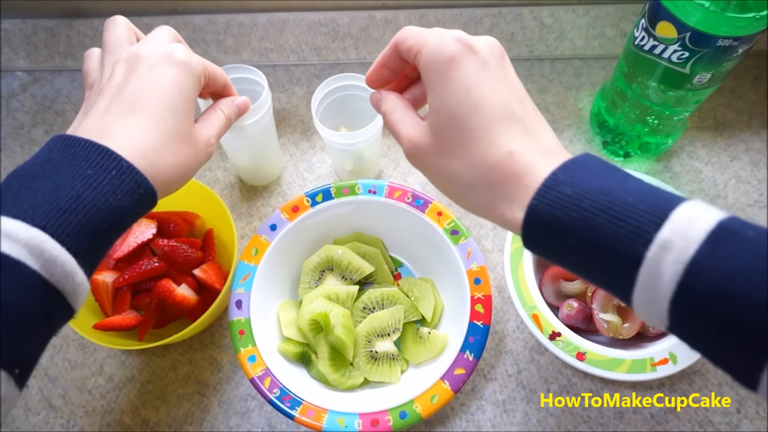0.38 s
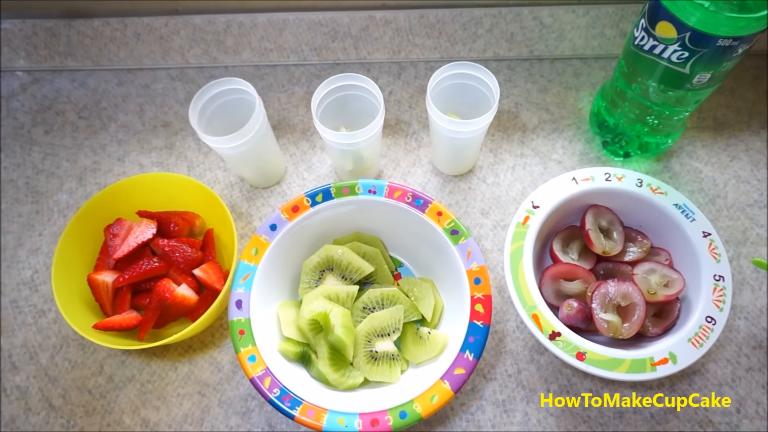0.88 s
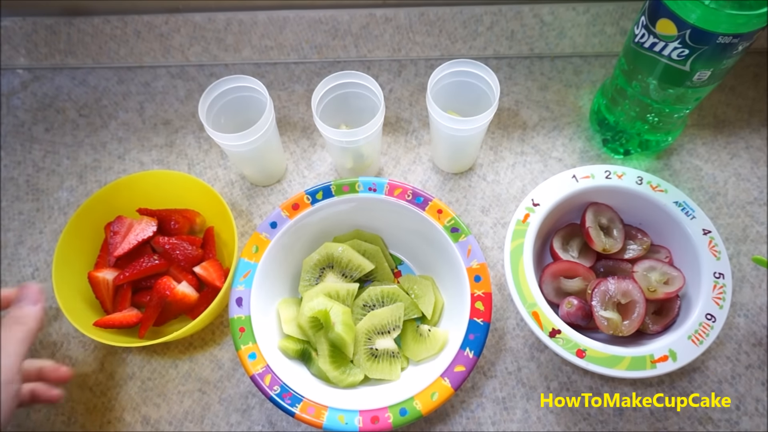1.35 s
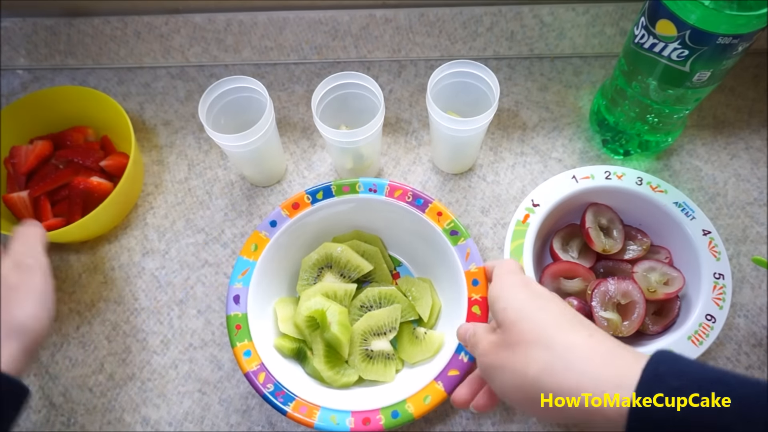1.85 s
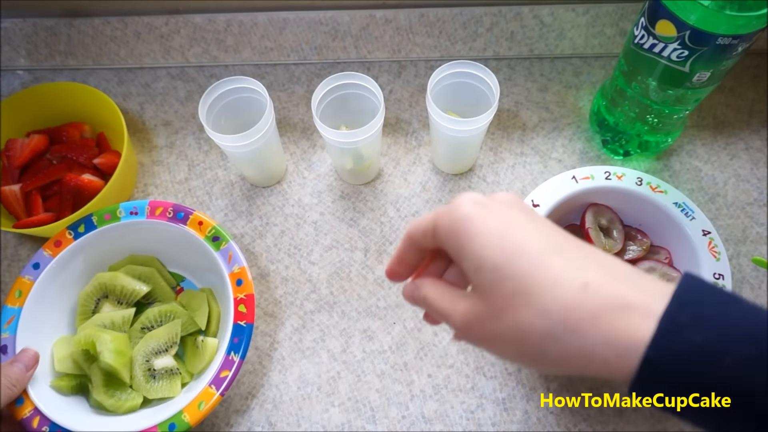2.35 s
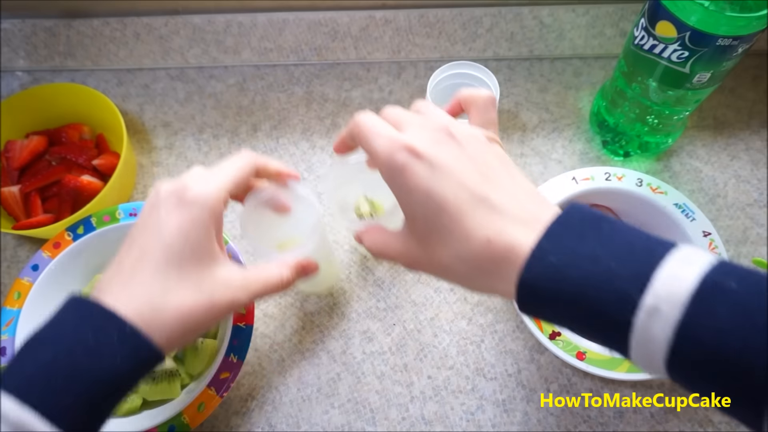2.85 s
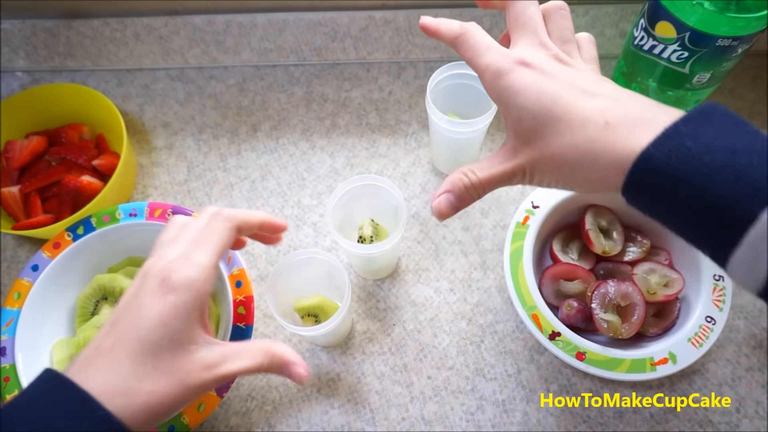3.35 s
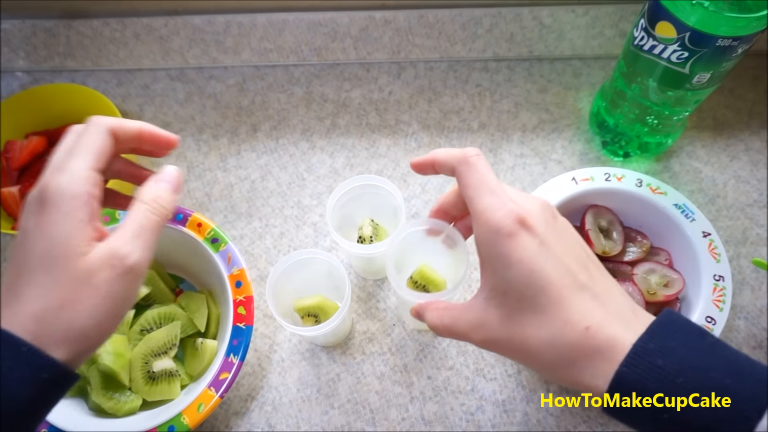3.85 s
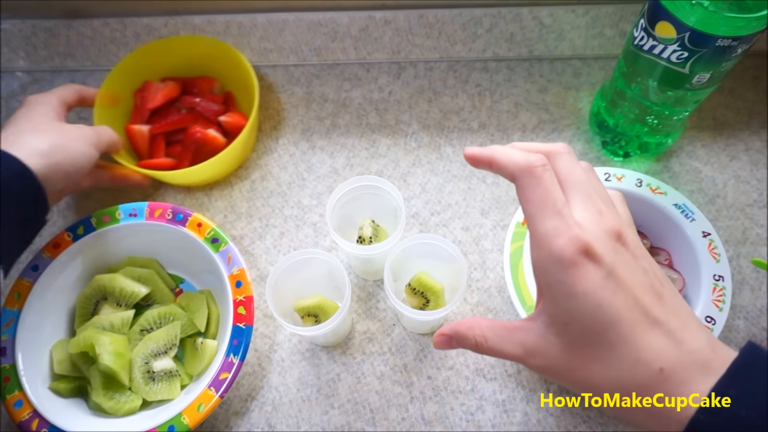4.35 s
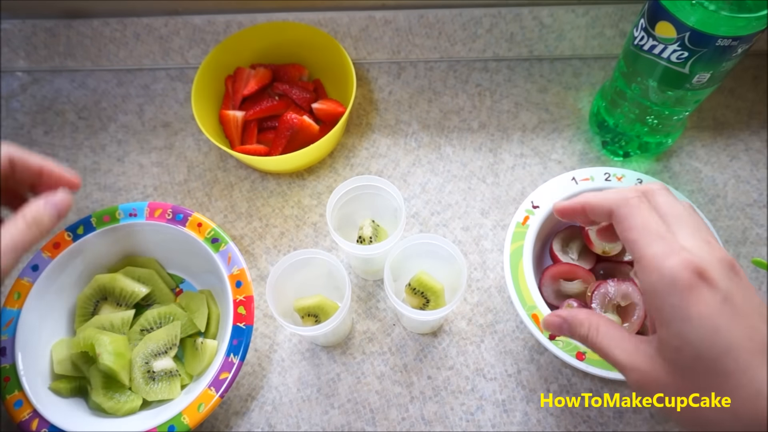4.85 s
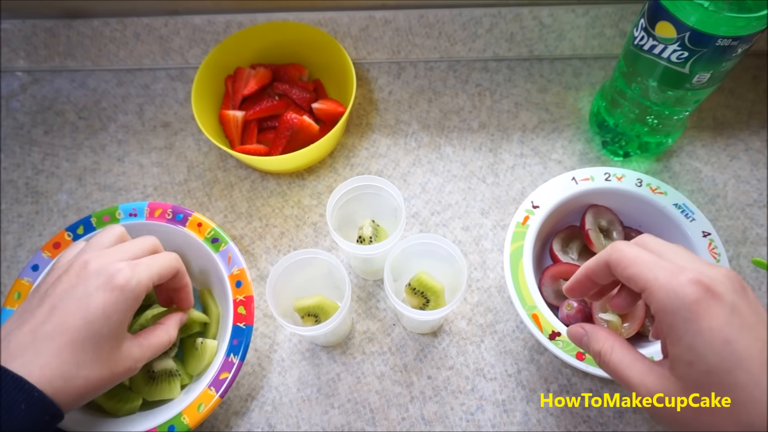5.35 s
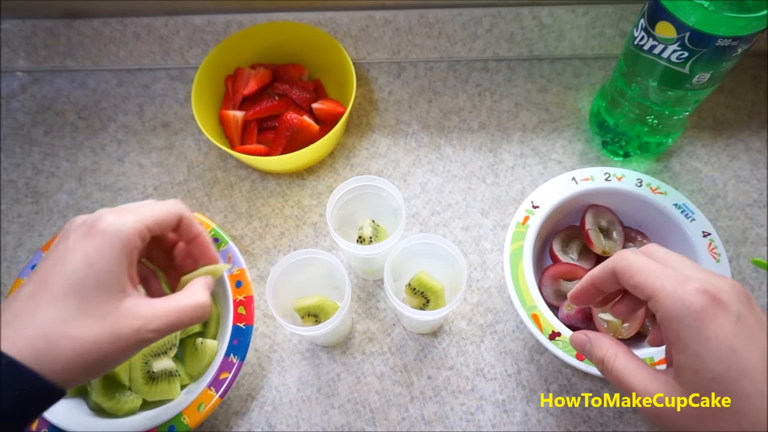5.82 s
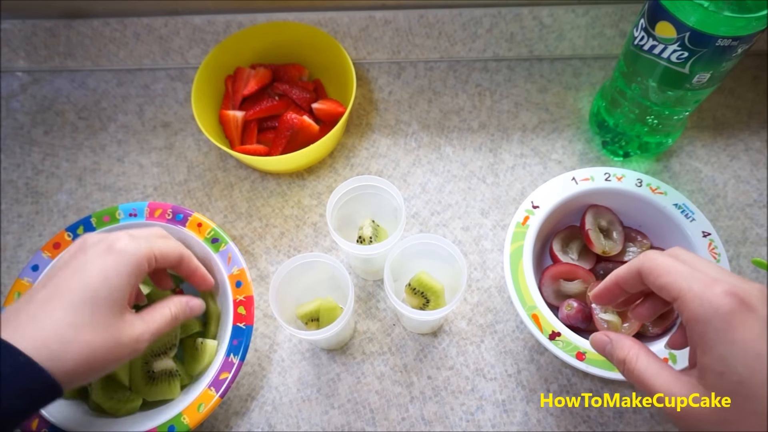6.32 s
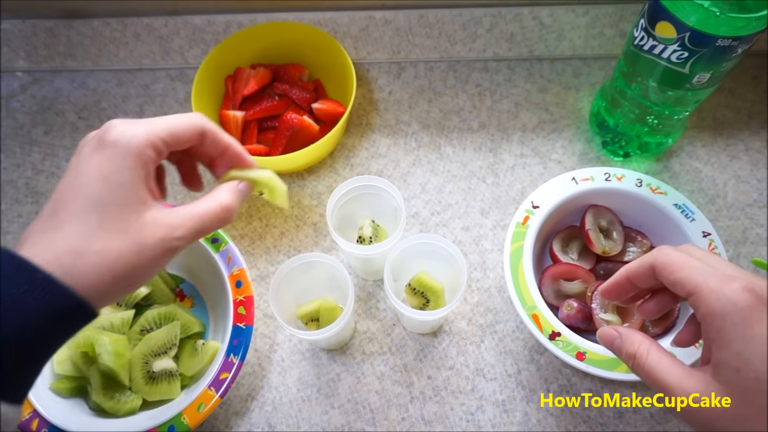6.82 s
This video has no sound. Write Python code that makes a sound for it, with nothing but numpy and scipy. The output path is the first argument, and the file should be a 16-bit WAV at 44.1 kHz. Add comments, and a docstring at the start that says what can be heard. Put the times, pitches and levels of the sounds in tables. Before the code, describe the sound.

Quiet kitchen counter handling: small wet clicks, a crunchy bump, bowls dragged with scraping, hollow plastic cup taps, and a faint ticking clock.

```python
"""A soft hiss comes first, then a small wet click, light taps on plastic cups and a clock ticking about twice a second.
On a kitchen counter, hands bump the edge, drop sliced fruit into small cups, set them down and drag two plastic bowls.
Blows ring a few fading tones under a bright crack; sliding is rough friction noise shaking resonances.
Small clicks are short filtered noise bursts, the bump a quick run of cracks, and the hard kitchen answers with an echo."""
import sys
import numpy as np
from scipy import signal
from scipy.fft import rfft, irfft, next_fast_len
from scipy.io import wavfile
from scipy.ndimage import uniform_filter1d, map_coordinates

SR = 44100
rng = np.random.default_rng(int(sys.argv[2]) if len(sys.argv) > 2 else 0)


def gain_from_db(level_db):
    """Convert decibel levels to linear amplitude factors (20 dB per decade)."""
    decades = np.asarray(level_db, float) / 20
    return 10 ** decades


def store_wav(level_fs):
    """Save 16-bit WAV to argv[1]."""
    pcm = np.round(np.clip(np.atleast_2d(level_fs), -1, 1) * 32767)
    wavfile.write(sys.argv[1], SR, pcm.T.astype(np.int16))


N = 317520  # samples, 7.2 s

# In all tables, t60 is the time in which a sound falls by 60 dB, and pan is left over right.
# taps on the cups, and soft swells echoing two of them: t/s, level/dB, rim tick/dB, brightness/(dB per octave)
CUP_TAPS = [(0.436, -48, 0, 4), (0.54, -38.5, -17, 8), (0.618, -44, -23, -12), (0.703, -50.5, -14, 0.1),
            (0.772, -42.5, -14, -15), (2.9755, -26, -36, -4), (2.998, -18.5, -19, 3.5),
            (3.039, -33, -38, 4), (3.0895, -26, -40, 0.1), (3.121, -44.5, -40, 5), (3.341, -47, -21, -19),
            (3.914, -45, 10, 3), (3.938, -39, 0, 6), (3.9475, -23, -24, -6), (3.978, -35, -33, 6),
            (4.03, -41, -35, 0.1), (4.075, -45.5, -35, 2), (6.18, -46, -3, 12), (6.972, -30, 7, 8),
            (6.984, -37.5, 0, 5), (7.0175, -31, -18, -2), (7.103, -26, 2.5, -4), (7.121, -29, -15, 10.5),
            (7.17, -31.5, -6, 7)]
# ringing tones of a cup: f/Hz, level/dB, t60/s
CUP_TONES = [(817, -14, 0.031), (1070, -20, 0.051), (1380, -5.5, 0.031), (1648, -6.5, 0.047),
             (1905, -2.5, 0.052), (1980, -6, 0.026), (2096, 10, 0.043), (2196, 7, 0.052), (2324, -5, 0.071),
             (2950, -4, 0.022), (4360, -38, 0.012), (5000, -26, 0.037), (5330, -29, 0.032),
             (8140, -23, 0.018)]
# resonances of a cup's sliding foot: f/Hz, width/Hz, level/dB
CUP_FOOT = [(820, 210, -10), (975, 78, -2.5), (1660, 690, -7)]
# cups sliding on their feet: start t/s, rise/s, fall/s, top level/dB
CUP_SLIDES = [(.7, 0.11, 0.75, -64), (1.0, 0.13, 0.66, -62.5), (3.33, 0.026, 1, -66),
              (6.92, 0.032, 0.46, -58.5), (7.07, 0.036, .15, -68)]
# knocks of the wide bowl's rim and foot: t/s, level/dB, sharp edge/dB, brightness/(dB per octave), pan/dB
BOWL_KNOCKS = [(1.788, -25.5, -17, -4, 7.5), (1.868, -24, -23, 8, 12), (1.8795, -15, -30.5, 3, 10),
               (2.0225, -16.5, -45, -0.5, 0), (2.057, -17, -10, -8, -3), (2.097, -20.5, -25, 4, 0),
               (2.16, -31, -16, -10, 0), (2.1845, -19.5, -36, -3.5, 4), (2.232, -25, -32, -7, 2.0),
               (2.245, -25.5, -30, -7.5, 4), (2.285, -15.5, -39, -2, -1), (2.291, -12, -36, -1.5, 6),
               (2.3035, -9.5, -22, 12, 12.5), (2.319, -15.5, -29, 10.5, 9), (2.34, -22, -15, -4.5, 8),
               (2.369, -16, -36, -4, 4.5)]
# ringing tones of the wide bowl: f/Hz, level/dB, t60/s
WIDE_BOWL_TONES = [(510, -24, 0.046), (740, 0, 0.017), (938, -5.5, 0.026), (1093, -14.5, 0.048),
                   (1440, 1, 0.015), (1637, -3, 0.025), (2110, -3, 0.014), (2430, 12.5, 0.0071),
                   (3076, -3.5, 0.036), (3760, 11, 0.0056), (4320, 14.5, 0.0067), (4500, 6, 0.0062),
                   (5160, -7, 0.0075), (6000, -32, 0.012)]
# the wide bowl is pushed in jerks: start t/s, rise/s, fall/s, top level/dB
WIDE_PUSHES = [(1.783, 0.0071, .3, -51), (1.8, .09, .28, -48), (1.9, .15, .38, -42), (2.14, .06, .15, -52),
               (2.14, .17, .36, -39)]
# the small bowl dragged twice, then nudged briefly: t/s, foot rumble level/dB, scrape level/dB
SMALL_DRAGS = [
    [(1.58, -85, -63.5), (1.63, -64, -49.5), (1.69, -57, -48.5), (1.78, -62.5, -49.5), (1.88, -51, -54.5),
     (1.92, -76, -70)],
    [(4.17, -87, -71), (4.25, -63.5, -52.5), (4.31, -51.5, -47), (4.375, -40, -43.5), (4.44, -44.5, -40.5),
     (4.49, -44.5, -36.5), (4.672, -72, -67), (4.714, -72, -53), (4.85, -77, -87)],
]
# resonances of the small bowl's foot: f/Hz, width/Hz, level/dB
SMALL_FOOT = [(520, 63, -2), (765, 44, 2), (928, 33, 1.5), (1104, 123, 0), (1420, 1440, -9)]
# resonances of the small bowl's wall: f/Hz, width/Hz, level/dB
SMALL_WALL = [(2060, 1300, -13.5), (2760, 460, 9), (3200, 320, 7.5), (4440, 1230, 2.5)]
# resonances of the small bowl's sliding hiss: f/Hz, width/Hz, level/dB
SMALL_HISS = [(6820, 1400, 0), (8630, 870, -1), (10600, 2600, -6), (13900, 3200, -9.5)]
# a fingernail touching a bowl's rim: t/s, level/dB, sharp edge/dB, brightness/(dB per octave), pan/dB
NAIL_TAPS = [(5.2213, -27.5, -6, 1.5, 4), (5.668, -43.5, -33, -13, 6.5), (6.3919, -42, -15, 0.1, 2.5),
             (6.4056, -38, -4, -6, 8), (6.4292, -29.5, -8, -3.5, 9)]
# ringing tones of that rim: f/Hz, level/dB, t60/s
RIM_TONES = [(3990, 0, 0.057), (4500, 0, 0.032), (6230, -6, 0.045), (8300, -3.5, 0.069), (9760, -20, 0.017)]
# short noisy clicks (wet fruit, crackle after the bump, bright edges of cup taps):
# t/s, level/dB, centre f/Hz, pan/dB
SMALL_CLICKS = [(0.317, -43, 2600, -6), (1.04, -43, 6000, 11), (1.049, -34, 5410, 13),
                (1.053, -34, 7100, 22), (1.068, -35, 4500, 12), (1.079, -33, 8300, 24.5),
                (1.114, -38.5, 6000, 17), (1.29, -38.5, 3710, 5), (2.691, -39, 4500, 11),
                (2.727, -25, 6000, 4), (2.998, -33, 6000, 5), (3.556, -39.5, 7930, 0.5),
                (4.29, -42, 3120, -1), (4.427, -20.5, 7000, 12.5), (4.481, -24, 2950, -7),
                (4.689, -44, 6580, 0), (4.711, -37, 4500, 0), (5.465, -46, 2630, 5), (5.99, -42, 2550, 2),
                (6.972, -25.5, 9200, 4), (6.743, -39.5, 7390, -2), (6.759, -40, 8430, 0.5)]
# cracks as a hand thumps the counter's edge: t/s, crackle level/dB, weight over crackle/dB
BUMP_CRACKS = [(.986, -38, -3), (0.99, -34.5, -3), (0.996, -26.5, -6.5), (1.002, -30.5, -8),
               (1.008, -27.5, -14), (1.012, -34, -8), (1.021, -48, -3)]
# resonances of the bump's weight: f/Hz, width/Hz, level/dB
BUMP_BODY = [(195, 320, 2), (394, 330, 5), (930, 360, 6), (1670, 1050, -2.5)]
# resonances of the bump's crackle: f/Hz, width/Hz, level/dB
BUMP_CRACKLE = [(2840, 590, -2), (4800, 880, -2.5), (5860, 500, 1.5), (8500, 3700, -9.5)]
# ringing tones of the clock: f/Hz, level/dB, t60/s
CLOCK_TONES = [(1620, -15, 0.046), (1702, 12, 0.077), (2460, -8, 0.082)]
# kitchen echo: f/Hz, t60/s, left-right likeness (0 to 1), level/dB
KITCHEN_ECHO = [(300, 0.17, 0.88, -7), (1000, 0.33, 0.35, -2), (2520, 0.24, 0.043, -3.5),
                (6000, 0.41, 0.052, -6.5), (14000, 0.28, .05, -1.5)]
# colour of the hiss: f/Hz, level/dB
HISS_COLOUR = [(15, -56), (25, -23.5), (256, -20), (301, -13.5), (489, -13.5), (531, -10.5), (911, -3),
               (1290, -3.5), (1440, -2), (1560, -3), (2160, -1.5), (3920, -2), (13600, -12), (16000, -13.5)]
# how alike the hiss is on both sides: f/Hz, left-right likeness (-1 to 1)
HISS_ALIKE = [(60, 0.26), (180, 0.38), (550, -0.087), (1650, -0.61), (4970, -0.28), (15000, -0.013)]


def cups():
    """Thin cups are tapped by fruit, set down, rocked and nudged; each contact leaves a dying chatter."""
    # a cup rocks on its foot, ever faster and softer
    first_s, gap_s, shrink = 0.8465, 0.0625, 0.915  # each swing lasts shrink times the one before
    first_db, loss_db, tick_db, bright_db = -39, 1.2, -13.5, -4  # loss per swing, brightness per octave
    rocks = []
    for k in range(12):
        start_s = first_s + gap_s * (1 - shrink ** k) / (1 - shrink)
        rocks.append((start_s, first_db - loss_db * k, tick_db, bright_db))
    contacts = CUP_TAPS + rocks
    panned_contacts = [(*row, 3.5) for row in contacts]
    taps = struck(panned_contacts, CUP_TONES, edge_hz=4700, edge_q=6, edge_s=0.03, edge_db=17)
    chatter = gain_from_db(-30) * dying([row[:2] for row in contacts], t60=0.41)
    bodies = [broadened(CUP_TONES, 1800, 2500, 7.9), CUP_FOOT]
    slides = dragged([chatter, strokes(CUP_SLIDES)], bodies, pan_db=10.5, spike_db=3.0, lump_db=3.0)
    return taps + slides


def bowls():
    """The wide bowl knocks and scrapes, the small one hisses as it slides, and nails tick on a rim."""
    knocks = struck(BOWL_KNOCKS, WIDE_BOWL_TONES, edge_hz=5900, edge_q=0.3, edge_s=0.034, edge_db=9.5)
    nails = struck(NAIL_TAPS, RIM_TONES, edge_hz=10500, edge_q=1.0, edge_s=0.017, edge_db=16.5)
    push = strokes(WIDE_PUSHES)
    wide_foot = broadened(WIDE_BOWL_TONES, 0, 2200, 6.9)
    wide_scrape = broadened(WIDE_BOWL_TONES, 3000, 9000, 3.6)
    wide = dragged([push, gain_from_db(1) * push], [wide_foot, wide_scrape], pan_db=4.0, spike_db=15.0, lump_db=1.5)
    foot, scrape = gains(SMALL_DRAGS)
    small_levels = [foot, scrape, gain_from_db(-2) * scrape]
    small_bodies = [SMALL_FOOT, SMALL_WALL, SMALL_HISS]
    small = dragged(small_levels, small_bodies, pan_db=9.0, spike_db=5.0, lump_db=2.1)
    return knocks + nails + wide + small


def small_clicks():
    """Wet fruit, crackle and the bright edges of taps are noise bursts, each around its own centre frequency."""
    t60 = 0.0075  # seconds
    out, t = np.zeros((2, N + SR)), np.arange(SR // 10) / SR
    for s, db, centre_hz, pan_db in SMALL_CLICKS:
        common, left, right = rng.standard_normal((3, len(t)))
        puff = (common + 0.78 * np.array([left, right])) * gain_from_db(-60 * t / t60)
        click = signal.lfilter(*signal.iirpeak(centre_hz, 1.3, fs=SR), puff)
        click = click / np.abs(click.mean(0)).max()
        out[:, round(s * SR):][:, :len(t)] += gain_from_db(db) * panned(pan_db) * click
    return out[:, :N]


def bump():
    """A hand thumps and crumples against the counter's edge: a short dense crunch with some weight below."""
    t60 = 0.022  # seconds
    weight = dying([(s, db + more_db) for s, db, more_db in BUMP_CRACKS], t60)
    crackle = dying([row[:2] for row in BUMP_CRACKS], t60)
    return dragged([weight, crackle], [BUMP_BODY, BUMP_CRACKLE], pan_db=11.5, spike_db=7.5, lump_db=0.35)


def clock():
    """Tick and tock, half a second apart, are blows on a few tones; every other one is softer."""
    beats = [(0.465 + 0.4995 * k, -52 - 7.4 * (k % 2 == 0), -30, 0, 0) for k in range(14)]
    return struck(beats, CLOCK_TONES, edge_hz=2600, edge_q=0.8, edge_s=0.01, edge_db=21)


def kitchen(x):
    """Echo dies at its own speed at each pitch; a fresh random echo pattern is drawn every 0.2 s."""
    out, step = np.zeros((2, N + 2 * SR)), SR // 5
    for start in range(0, N, step):
        hz, t, (a, b) = signal.stft(rng.standard_normal((2, SR * 2 // 3)), SR, nperseg=256)
        t60, alike, level_db = (along([(row[0], row[k]) for row in KITCHEN_ECHO], hz)[:, None]
                                for k in (1, 2, 3))
        share = np.clip(alike, 0, 1)  # long waves reach both microphones alike
        pair = np.array([a, share * a + np.sqrt(1 - share ** 2) * b])
        # divide so that a longer echo does not carry more energy
        fade = gain_from_db(level_db - 60 * t / t60) / np.sqrt(t60 * SR / np.log(1e6))
        tail = signal.istft(pair * fade, SR, nperseg=256)[1]
        wet = signal.fftconvolve(x[None, start:start + step], tail, axes=1)
        out[:, start + 60:][:, :wet.shape[1]] += wet  # 60 samples of delay
    return out[:, :N]


def hiss():
    """Microphone and room noise is coloured random noise, alike on both sides only in part."""
    def turn(hz):
        # angle that shares the noise between middle and sides
        return np.arccos(np.clip(along(HISS_ALIKE, hz), -1, 1)) / 2

    def colour(hz):
        return gain_from_db(along(HISS_COLOUR, hz)) * [np.cos(turn(hz)), np.sin(turn(hz))]

    mid, side = filtered(rng.standard_normal((2, N)), colour)
    level = gain_from_db(-62.5 + 0.14 * wobble(1.87))  # drifts very slightly
    return level * np.array([mid + side, mid - side]) / np.std(mid)


def struck(events, modes, edge_hz, edge_q, edge_s, edge_db):
    """Each blow rings the tones at new strengths under a short crack; each has its own given brightness."""
    pitch_scatter = 0.007  # of a tone's frequency, blow to blow
    contact_hz, contact_db, contact_t60 = 1700, -5, 0.0061  # dull click of first contact, t60 in s
    out, t = np.zeros((2, N + SR)), np.arange(SR // 5) / SR
    hz, level_db, t60 = np.transpose(modes)[:, :, None]
    # neighbours start against each other, so close pairs swell and beat
    opposed = np.pi * np.arange(len(modes))[:, None]
    edge, dull = signal.iirpeak(edge_hz, edge_q, fs=SR), signal.iirpeak(contact_hz, 0.8, fs=SR)
    for s, db, sharp_db, bright_db, pan_db in events:
        chance = rng.standard_normal((3, len(modes), 1))
        strength_db = level_db + bright_db * np.log2(hz / 2000) + 3 * chance[0]
        phase = 2 * np.pi * hz * (1 + pitch_scatter * chance[1]) * t + opposed + 0.5 * chance[2]
        ring = np.sum(gain_from_db(strength_db - 60 * t / t60) * np.sin(phase), axis=0)
        ring = ring * (1 - np.exp(-t / 0.00018)) / np.abs(ring).max()  # soften the very start
        noise = rng.standard_normal((2, len(t)))
        crack = signal.lfilter(*edge, signal.lfilter(*edge, noise)) * gain_from_db(-60 * t / edge_s)
        contact = unit(signal.lfilter(*dull, rng.standard_normal(len(t))))
        contact = contact * gain_from_db(contact_db - 60 * t / contact_t60)
        blow = ring + contact + gain_from_db(sharp_db + edge_db) * crack
        blow = blow / max(1, np.abs(blow).max())
        out[:, round(s * SR):][:, :len(t)] += gain_from_db(db) * panned(pan_db) * blow
    # such small bodies cannot radiate deep sound
    return signal.sosfilt(signal.butter(3, 560, "high", fs=SR, output="sos"), out[:, :N])


def dragged(levels, bodies, pan_db, spike_db, lump_db):
    """One friction force shakes several sets of resonances, each set with its own gain."""
    force, out = grit(spike_db, lump_db), 0
    for gain, body in zip(levels, bodies):
        rings = 0
        for k, peak in enumerate(body):
            # the contact point moves, so each resonance comes and goes
            wander = gain_from_db(2.2 * wobble(18))
            rings = rings + (-1) ** k * wander * filtered(force, resonances([peak]))
        out = out + gain * unit(rings)
    return panned(pan_db) * out


def grit(spike_db, lump_db):
    """Friction force: dense grains of uneven size, catching in lumps."""
    grains = rng.standard_normal(N) * gain_from_db(np.clip(spike_db * rng.standard_normal(N), -20, 12))
    return grains * gain_from_db(np.clip(lump_db, 0, 3) * (wobble(35) + wobble(110)))


def strokes(rows):
    """Gain of movements that swell to a top level and fade."""
    depth_db = 44  # a stroke starts and ends this far under its top
    spans = []
    for s, rise, fall, db in rows:
        spans.append([(s, db - depth_db), (s + rise, db), (s + rise + fall, db - depth_db)])
    return gains(spans)[0]


def dying(rows, t60):
    """Gain that jumps up at each (t/s, level/dB) and dies away."""
    t = np.arange(N) / SR
    return sum((t > s) * gain_from_db(db - 60 * np.abs(t - s) / t60) for s, db in rows)


def gains(spans):
    """One smoothed gain per sample for each level column, practically silent outside the spans."""
    t = np.arange(N) / SR
    total = 0
    for rows in spans:
        s, *columns = np.transpose(rows)
        total = total + np.array([gain_from_db(np.interp(t, s, db, left=-120, right=-120)) for db in columns])
    return uniform_filter1d(total, 221, axis=1)  # 5 ms average


def broadened(modes, lo_hz, hi_hz, damping):
    """The tones in a range become resonances, widened by contact with the counter."""
    return [(hz, damping / t60, db) for hz, db, t60 in modes if lo_hz <= hz < hi_hz]


def resonances(peaks):
    """Response of (f/Hz, width/Hz, level/dB) resonances, which ring only after being shaken."""
    def response(f):
        return sum((-1) ** k * gain_from_db(db) * 1j * f * width / (centre * centre - f * f + 1j * f * width)
                   for k, (centre, width, db) in enumerate(peaks))
    return response


def filtered(x, response):
    """Shapes x by a complex response over frequency."""
    size = next_fast_len(N + SR // 2)
    return irfft(rfft(x, size) * response(np.fft.rfftfreq(size, 1 / SR)), size)[..., :N]


def wobble(rate):
    """A smooth random curve with rate random points a second."""
    return map_coordinates(rng.standard_normal(int(N * rate / SR) + 4), [np.arange(N) * rate / SR])


def along(points, hz):
    """Reads (f/Hz, value) points on a logarithmic frequency axis."""
    f, value = np.transpose(points)
    return np.interp(np.log(hz + 1), np.log(f + 1), value)


def panned(pan_db):
    """Left and right gains around the middle."""
    return gain_from_db(np.array([[pan_db / 2], [-pan_db / 2]]))


def unit(x):
    """Scales x to an rms (average strength) of 1."""
    return x / np.sqrt(np.mean(x ** 2) + 1e-20)


def scene():
    """Near sounds with their echo; the bump is closest and driest, the far clock arrives mostly as echo."""
    near, hand, far = cups() + bowls() + small_clicks(), bump(), clock()
    to_kitchen = near.mean(0) + gain_from_db(-10.5) * hand.mean(0) + gain_from_db(13.5) * far[0]
    return near + hand + 0.47 * far + kitchen(to_kitchen)


def band_limit(x):
    """A steep low-pass at the top of the band."""
    return signal.sosfilt(signal.butter(12, 16680, fs=SR, output="sos"), x)


def record(dry):
    """Two small microphones: little bass, soft top, direction mainly for short waves, and their own hiss."""
    mid, side = (dry[0] + dry[1]) / 2, (dry[0] - dry[1]) / 2
    side = signal.sosfilt(signal.butter(1, 600, "high", fs=SR, output="sos"), side)
    pair = signal.sosfilt(signal.butter(1, 9000, fs=SR, output="sos"), [mid + side, mid - side])
    thin = signal.sosfilt(signal.butter(3, 400, "high", fs=SR, output="sos"), pair)
    mix = thin + gain_from_db(-66) * pair + hiss()  # a faint trace of the bass stays
    return band_limit(mix)


dry = scene()
out = record(dry)
store_wav(out)
```